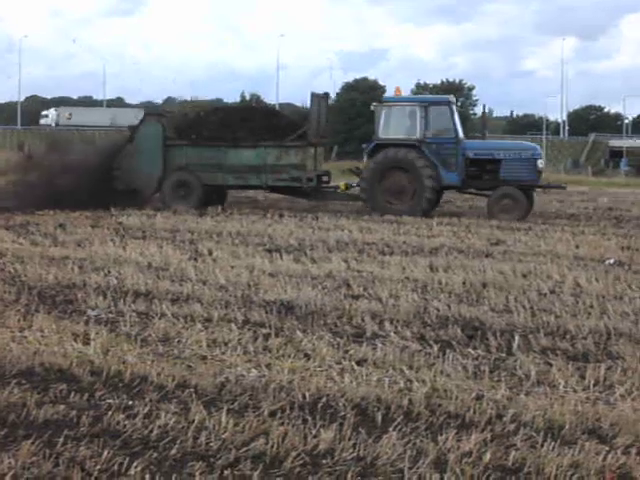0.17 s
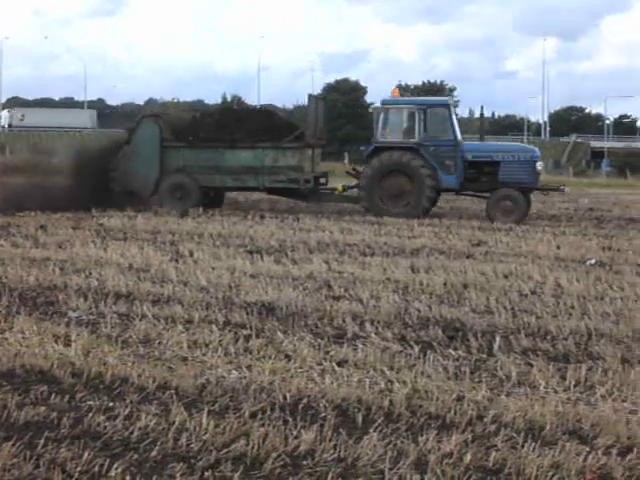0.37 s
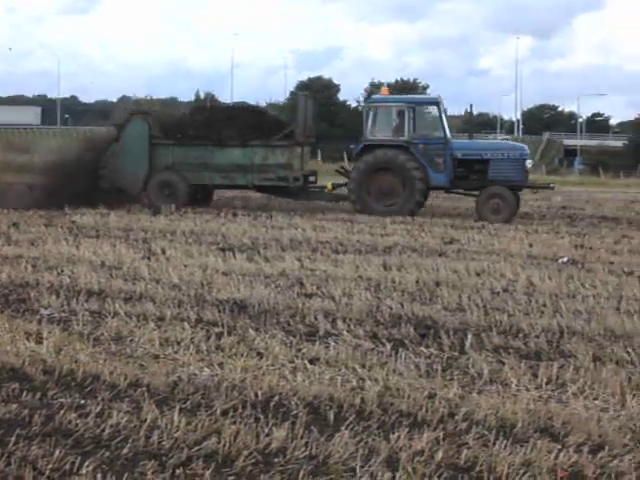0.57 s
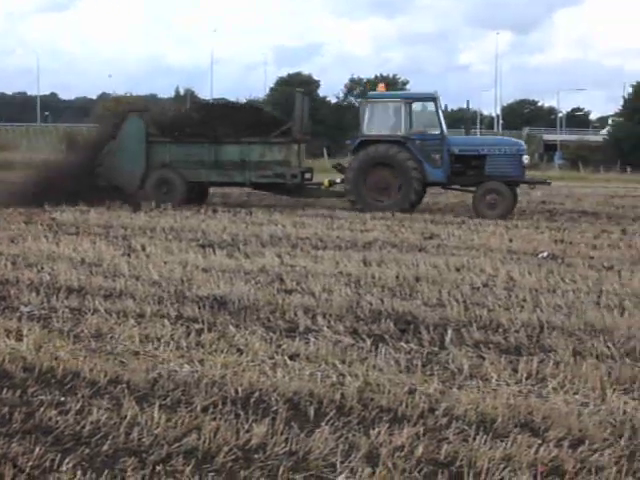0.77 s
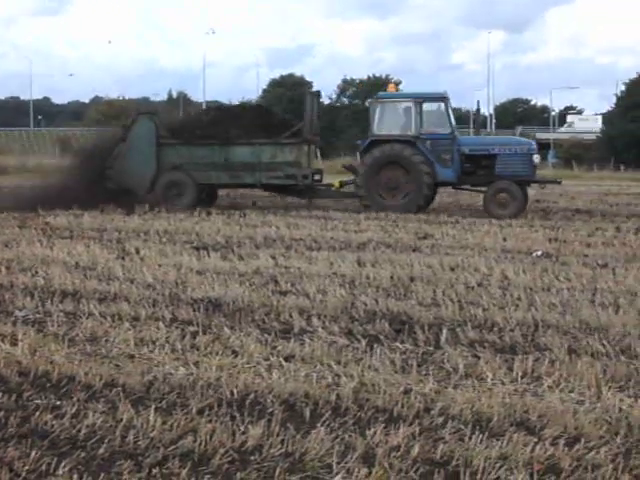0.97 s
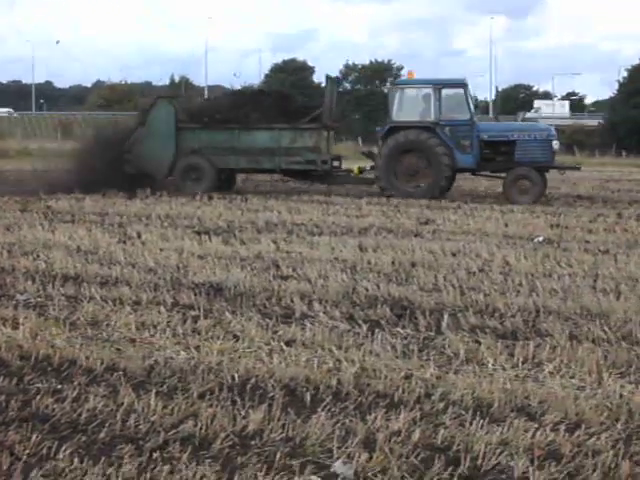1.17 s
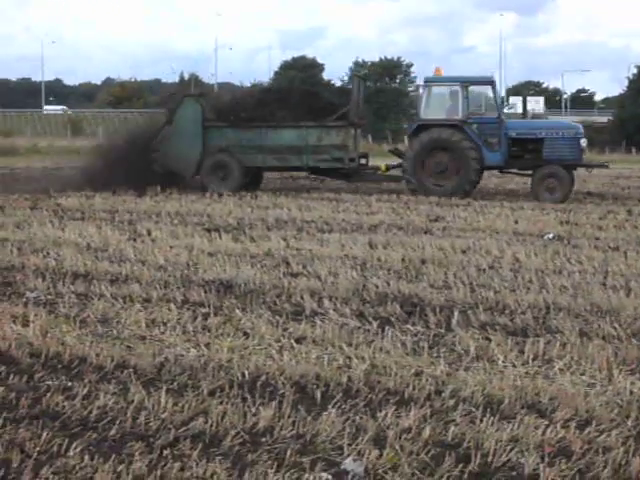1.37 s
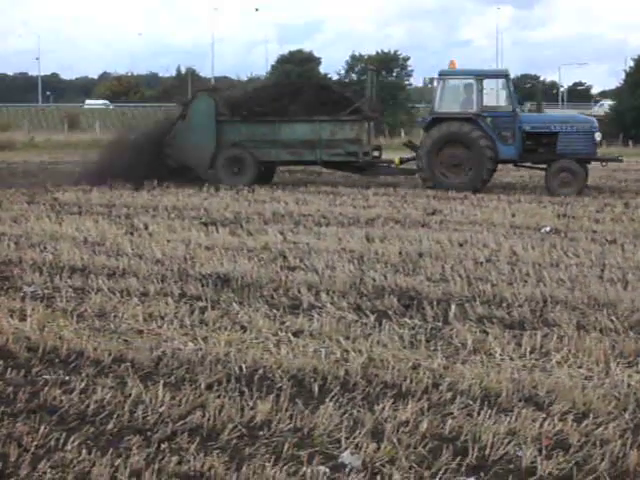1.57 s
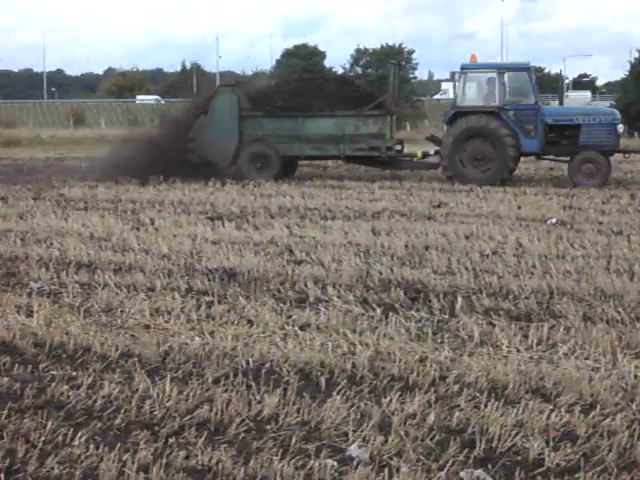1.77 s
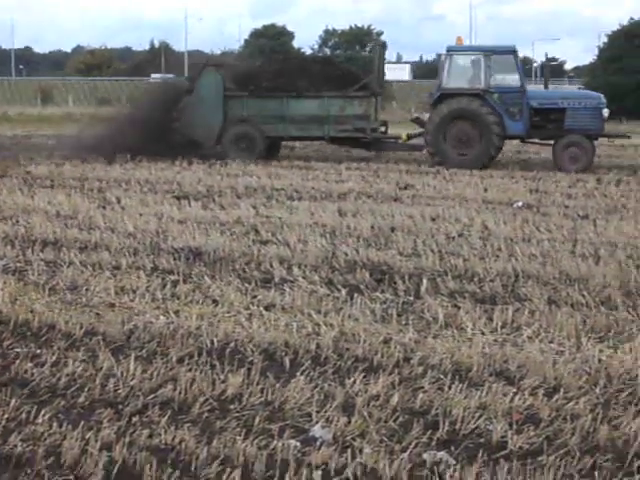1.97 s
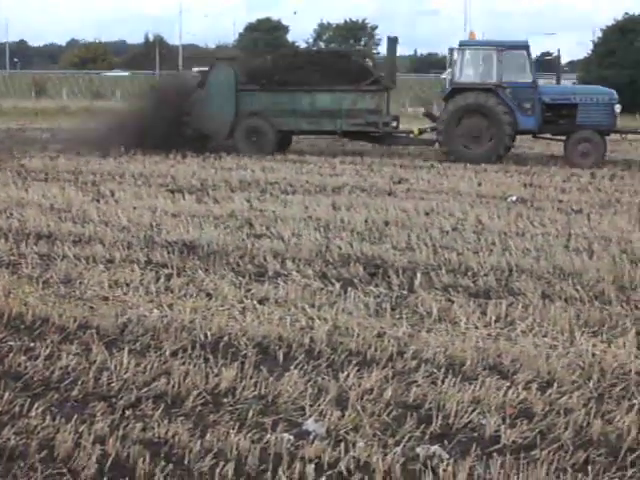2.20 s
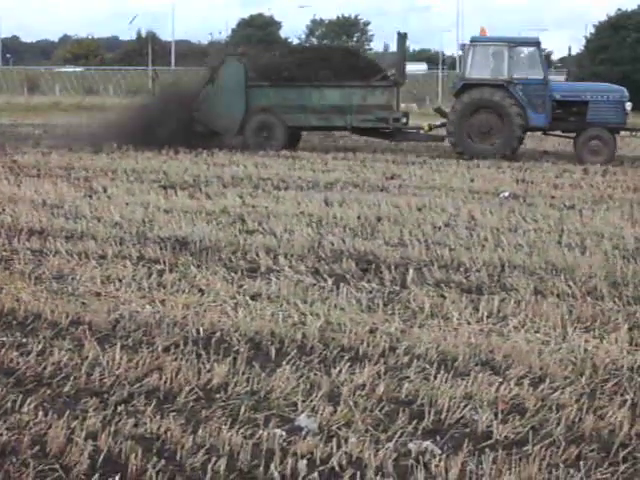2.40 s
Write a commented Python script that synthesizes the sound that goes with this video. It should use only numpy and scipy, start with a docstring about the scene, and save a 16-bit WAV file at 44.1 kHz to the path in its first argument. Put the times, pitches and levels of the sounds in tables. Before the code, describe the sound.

A diesel tractor drones steadily, pulling a thrashing muck spreader in a windy field.

```python
"""Stubble field: a four-cylinder diesel tractor pulls a muck spreader at steady revs.
Each firing puffs down the droning exhaust and rattles the block; the gears whine faintly.
The spreader's flails thrash the muck; a few clods and stones crack, clank and thud against it.
A main road roars behind. Wind rumbles on a small, dull microphone that overloads on the peaks.
A few thin ticks sound above its band."""
import sys
import numpy as np
from scipy import signal
from scipy.fft import rfft, irfft, next_fast_len
from scipy.io import wavfile
from scipy.ndimage import uniform_filter1d

SR = 44100
rng = np.random.default_rng(int(sys.argv[2]) if len(sys.argv) > 2 else 0)


def transcribe(signal):
    """Save signal, clipped to [-1, 1], as a 16-bit WAV file at the path in sys.argv[1]."""
    frames = np.atleast_2d(signal).T
    limited = np.clip(frames, -1, 1)
    pcm = np.round(limited * 32767).astype(np.int16)
    wavfile.write(sys.argv[1], SR, pcm)


N = 112014
TIME = np.arange(N) / SR


# firing strength per cylinder: level/dB
CYLINDER_BALANCE = [1.5, -0.76, 1.1, -2]
# exhaust tones: multiple of firing rate, level/dB
EXHAUST_TONES = [(1, -28.5), (2, -24), (2.5, -32.5), (3, -31), (4, -33), (5.25, -43.5), (6, -46)]
# exhaust puff spectrum: f/Hz, relative level/dB
PUFF_SPECTRUM = [(50, -21), (90, -5.5), (120, -7.5), (155, 4), (185, -6), (240, -9.5), (320, -7.5),
                 (450, -18), (800, -18.5)]
# block clatter spectrum: f/Hz, relative level/dB
BLOCK_SPECTRUM = [(500, -8), (950, 1), (1350, 1), (1580, -5.5), (1780, -2), (2100, -6), (2420, 1),
                  (2850, -.5), (3050, -2), (3350, -0.5), (3750, -10), (4000, -14), (4400, -25)]
# clatter gain curve: t/s, level/dB
CLATTER_GAIN = [(0, 2.5), (.42, .8), (.6, -1.8), (1.0, 0.2), (1.2, 0), (1.8, -0.7), (2.2, -0.8),
                (2.54, -0.1)]

def engine(run_s, firing_hz=54.15, decay_s=.014, puff_db=-21.5, block_db=-24.5):
    """Each firing sends a puff down the exhaust and rattles the block."""
    firings = firing_hz * run_s + rng.random()
    strength = from_db(CYLINDER_BALANCE)[firings.astype(int) % len(CYLINDER_BALANCE)]
    pulses = strength * strokes(firings, firing_hz, decay_s)
    puffs = evened(coloured(pulses * rng.standard_normal(N), PUFF_SPECTRUM))
    clatter = coloured(pulses * rng.standard_normal(N), BLOCK_SPECTRUM)
    clatter_db = block_db + np.interp(TIME, *np.transpose(CLATTER_GAIN))
    return tones(firings, EXHAUST_TONES) + from_db(puff_db) * puffs + from_db(clatter_db) * clatter


# rotor tones: multiple of blow rate, level/dB
ROTOR_TONES = [(1, -40.5), (2, -28.5), (4, -30), (5, -39)]
# thrashed muck spectrum: f/Hz, relative level/dB
THRASH_SPECTRUM = [(300, -10.5), (600, -13.5), (1000, 4), (1600, -5.5), (2100, -6), (2600, 1), (3400, -6.5),
                   (4300, -28)]

def spreader(run_s, blow_hz=38, grains_per_s=3300, spread_db=2.5, thrash_db=-27.5):
    """The rotor hums; each flail blow throws a spray of small impacts."""
    blows = blow_hz * run_s + rng.random()
    sizes = from_db(spread_db * np.minimum(rng.exponential(1, N), 4))
    signs = rng.choice([-1, 1], N)
    hits = rng.random(N) < grains_per_s / SR
    grains = sizes * signs * hits * strokes(blows, blow_hz, decay_s=.026)
    return tones(blows, ROTOR_TONES) + from_db(thrash_db) * coloured(grains, THRASH_SPECTRUM)


# gear whine: f/Hz, width/Hz, level/dB
GEAR_TONES = [(1239, 5.3, -37), (1686, 10, -40.5), (2390, 44, -43)]

def gears():
    """The drive whines in narrow, unsteady bands."""
    whine = np.zeros(N)
    for hz, width_hz, db in GEAR_TONES:
        phase = 2 * np.pi * hz * TIME
        whine += from_db(db) * (drift(width_hz / 2) * np.sin(phase) + drift(width_hz / 2) * np.cos(phase))
    return whine


# clod and stone hits: t/s, length/s, level/dB, lower band edge f/Hz
CLOD_HITS = [(.886, 0.011, -26.5, 3130), (.984, 0.0062, -15.5, 2400), (1.334, 0.0073, -20.5, 3100),
             (1.635, 0.01, -12, 2750), (1.64, 0.0075, -12, 990), (2.2, 0.0069, -18, 2600),
             (2.239, 0.0076, -21, 2800)]
# panel modes: f/Hz, relative level/dB, T60/s
PANEL_MODES = [(1067, 4, .03), (1459, 1.5, 0.016), (1740, 2.5, 0.021)]
# spreader body modes: f/Hz, relative level/dB, T60/s
BODY_MODES = [(455, -1.5, 0.064), (514, 0.092, 0.072), (600, -1, .03), (770, -0.71, 0.017)]

def clods(top_hz=3800):
    """Clods and stones hit the spreader: bright cracks, one panel clank, one dull body thud."""
    cracks = np.zeros(N)
    for start_s, length_s, db, low_hz in CLOD_HITS:
        crack = butterworth(crunch(start_s, length_s), 2, [low_hz, top_hz], "band")
        cracks += from_db(db) * crack * np.sqrt(length_s * SR / np.sum(crack ** 2))
    clank = from_db(-10) * struck_steel(PANEL_MODES, start_s=1.641, length_s=.006)
    thud = from_db(-10.5) * struck_steel(BODY_MODES, start_s=2.12, length_s=.009)
    return cracks + clank + thud


def struck_steel(modes, start_s, length_s):
    """A crunch sets the modes of a steel part ringing."""
    ringing = np.zeros(N)
    for hz, db, t60_s in modes:
        radius = np.exp(-np.log(1000) / (t60_s * SR))
        angle = 2 * np.pi * hz / SR
        feedback = [1, -2 * radius * np.cos(angle), radius ** 2]
        ring = signal.lfilter([0, np.sin(angle)], feedback, crunch(start_s, length_s))
        ringing += from_db(db) * ring / np.abs(ring).max()
    return ringing


def crunch(start_s, length_s, release_s=.0015):
    """A short run of contacts: a noise burst that stops quickly."""
    age_s = TIME - start_s
    envelope = (age_s >= 0) * np.exp(-np.clip((age_s - length_s) / release_s, 0, 30))
    return envelope * rng.standard_normal(N) + 1e-18


# tyre roar spectrum: f/Hz, relative level/dB
TYRE_SPECTRUM = [(200, -8.5), (420, -9), (580, -8), (720, -3), (880, 1), (1030, -.5), (1180, -6),
                 (1500, -11), (2200, -15.5), (4000, -23.5)]
# traffic gain curve: t/s, level/dB
TRAFFIC_GAIN = [(0, 1.5), (.25, 0.7), (.6, 0.5), (.85, 1), (1.1, 0.5), (1.55, 0.2), (1.75, -1.2),
                (2.1, 0.5), (2.54, 0.5)]

def road(base_db=-18.5):
    """Tyres of far traffic merge into a smooth roar."""
    level_db = base_db + np.interp(TIME, *np.transpose(TRAFFIC_GAIN))
    return from_db(level_db) * coloured(rng.standard_normal(N), TYRE_SPECTRUM)


# wind rumble spectrum: f/Hz, relative level/dB
RUMBLE_SPECTRUM = [(10, -6.5), (25, -11), (45, 3), (70, 0), (110, -2), (200, -9.5), (400, -30.5)]
# wind buffets: t/s, level/dB
BUFFET_PEAKS = [(0.021, -22.5), (.175, -16.5), (.56, -15), (.77, -27), (.87, -19), (1.284, -15.5),
                (1.601, -15), (1.809, -19.5), (2.11, -15.5), (2.46, -17.5)]
# buffet spectrum: f/Hz, relative level/dB
BUFFET_SPECTRUM = [(40, -6), (70, -6), (120, 2.5), (170, 1.5), (260, -25)]

def wind(rumble_db=-24.5, gust_db=4.5, buffet_width_s=.03):
    """Wind on the microphone: a lumpy rumble and short buffets."""
    gusts = from_db(gust_db * drift(1.4))
    rumble = from_db(rumble_db) * coloured(gusts * rng.standard_normal(N), RUMBLE_SPECTRUM)
    swell = sum(from_db(db) * np.exp(-((TIME - s) / buffet_width_s) ** 2) for s, db in BUFFET_PEAKS)
    return rumble + swell * evened(coloured(rng.standard_normal(N), BUFFET_SPECTRUM))


# thin ticks: t/s, peak level/dB
TICK_PEAKS = [(.108, -44), (.155, -41), (.222, -40.5), (.872, -45.5), (.987, -26.5), (1.288, -35.5),
              (1.642, -21.5), (1.647, -31), (1.648, -23), (1.807, -42), (2.128, -35), (2.318, -35.5)]

def ticks(rolloff_hz=3500, highpass_hz=4270):
    """Single sharp ticks above the band of the machinery."""
    times_s, db = np.transpose(TICK_PEAKS)
    clicks = np.full(N, 1e-18)
    clicks[(times_s * SR).astype(int)] = from_db(db)
    dulled = butterworth(clicks, 1, rolloff_hz)
    thin = butterworth(dulled, 2, highpass_hz, "high")
    return thin * clicks.max() / np.abs(thin).max()


def tones(cycles, orders, flutter_db=.9, flutter_hz=2.7):
    """Fluttering sines on multiples of a cycle rate."""
    hum = np.zeros(N)
    for multiple, db in orders:
        amplitude = np.sqrt(2) * from_db(db + flutter_db * drift(flutter_hz))
        hum += amplitude * np.sin(2 * np.pi * (multiple * cycles + rng.random()))
    return hum


def strokes(cycles, hz, decay_s, attack_s=.0012):
    """Quick rise and decay each cycle, on the tail of the one before."""
    age_s = cycles % 1 / hz
    tail = np.exp(-1 / hz / decay_s)
    return np.exp(-age_s / decay_s) - (1 - tail) * np.exp(-age_s / attack_s)


def coloured(x, spectrum):
    """Filter by a spectrum, falling 18 dB/octave past its ends; unit rms."""
    hz, db = np.transpose(spectrum)
    size = next_fast_len(N + 4096)
    bins_hz = np.maximum(np.arange(size // 2 + 1) * SR / size, 1)
    octaves_out = np.maximum(np.log2(hz[0] / bins_hz), 0) + np.maximum(np.log2(bins_hz / hz[-1]), 0)
    gain = from_db(np.interp(np.log(bins_hz), np.log(hz), db) - 18 * octaves_out)
    return unit_rms(irfft(rfft(x, size) * gain, size)[:N])


def drift(rate_hz):
    """Slow random wander; unit rms."""
    hop, settle = 40, 2000
    pole = np.exp(-2 * np.pi * rate_hz * hop / SR)
    noise = rng.standard_normal(N // hop + settle + 2)
    slow = signal.lfilter([1], [1, -2 * pole, pole ** 2], noise)[settle:]
    return np.interp(np.arange(N) / hop, np.arange(len(slow)), unit_rms(slow))


def evened(x):
    """Divide out slow level swings; unit rms."""
    return unit_rms(x / np.sqrt(uniform_filter1d(x * x, size=2000) + 1e-6))


def butterworth(x, order, hz, kind="low"):
    return signal.sosfilt(signal.butter(order, hz, kind, fs=SR, output="sos"), x)


def unit_rms(x):
    return x / np.sqrt(np.mean(x ** 2) + 1e-20)


def from_db(db):
    return 10 ** (np.asarray(db) / 20)


def scene(rev_wander=.0018):
    """Mono mix; engine and rotor share one slightly wandering speed."""
    run_s = np.cumsum(1 + rev_wander * drift(1.45)) / SR
    return (engine(run_s) + spreader(run_s) + gears() + clods() + road() + wind())[None]


def record(dry, overload=.7, fade_s=.004, mic_top_hz=4087, cutoff_hz=15900):
    """The microphone clips and dulls the mix; ticks join ahead of the final low-pass."""
    fade_out = np.clip((TIME[-1] - TIME) / fade_s - 1, 0, 1)
    clipped = np.clip(dry, -overload, overload) * fade_out
    dull = butterworth(clipped, 28, mic_top_hz)
    top_cut = signal.ellip(10, .1, 80, cutoff_hz, fs=SR, output="sos")
    return signal.sosfilt(top_cut, dull + ticks())


dry = scene()
out = record(dry)
transcribe(out)
```